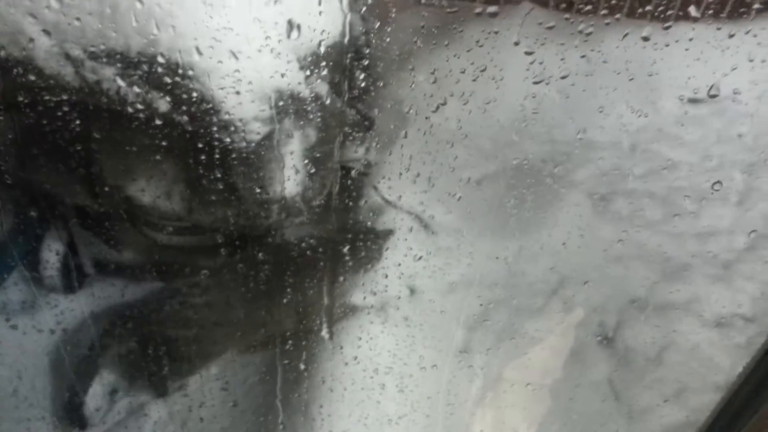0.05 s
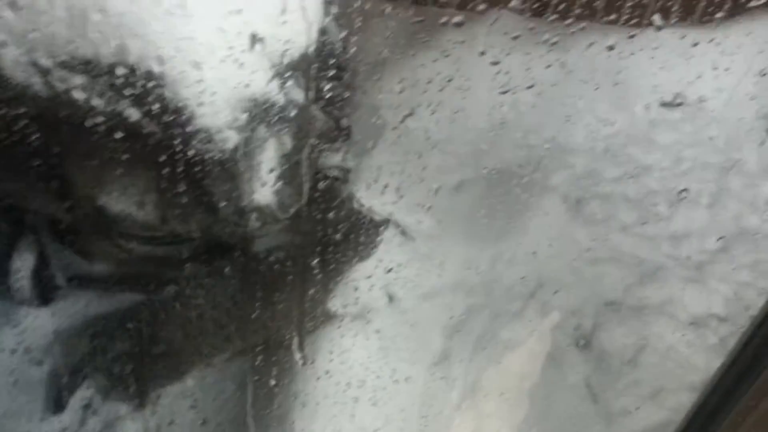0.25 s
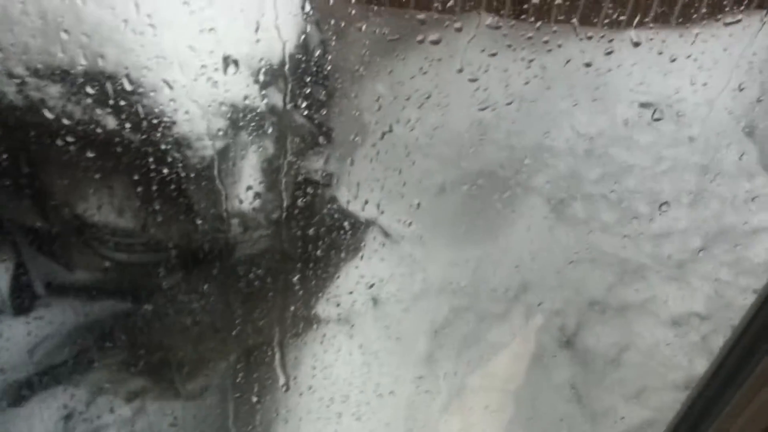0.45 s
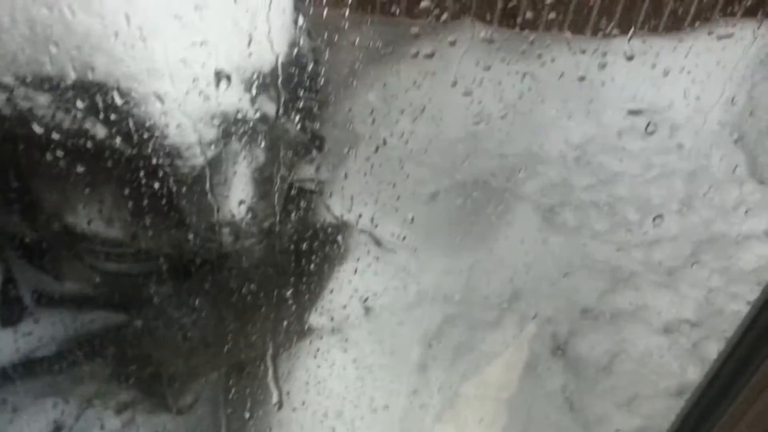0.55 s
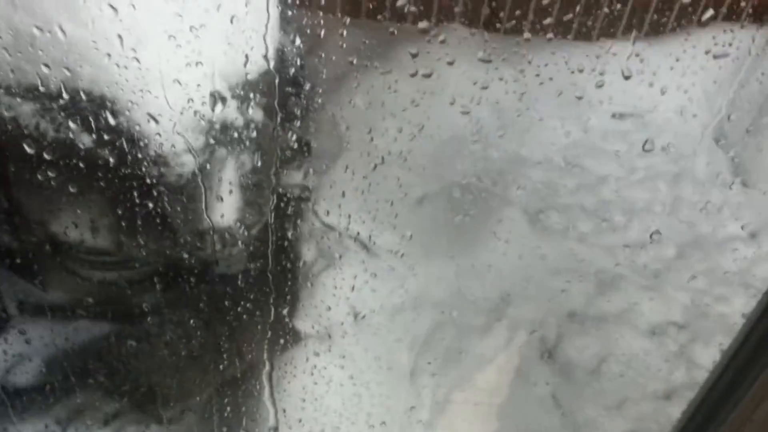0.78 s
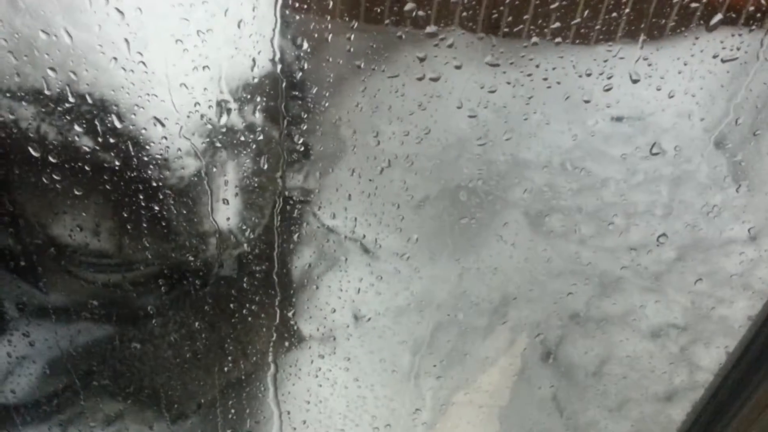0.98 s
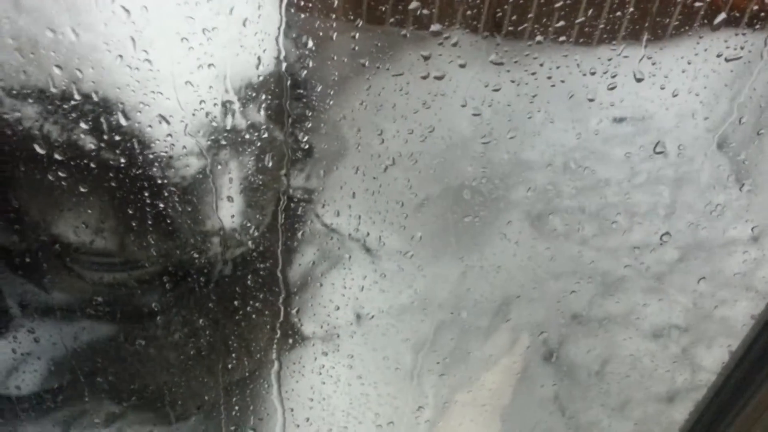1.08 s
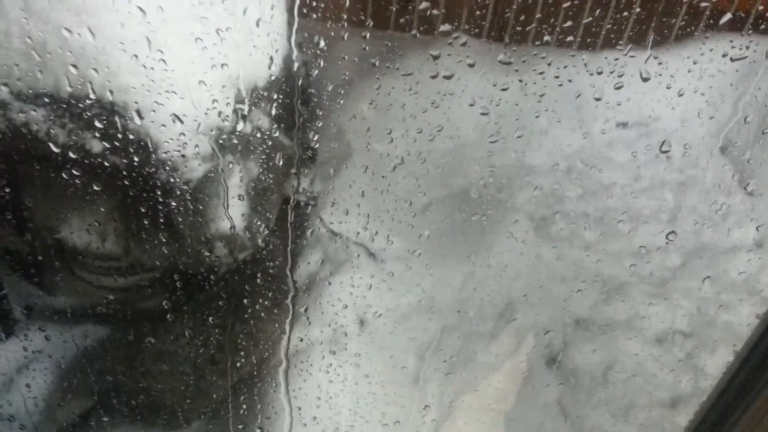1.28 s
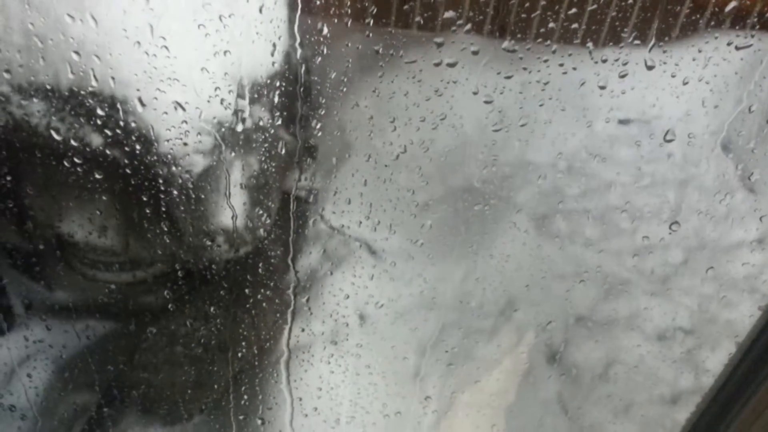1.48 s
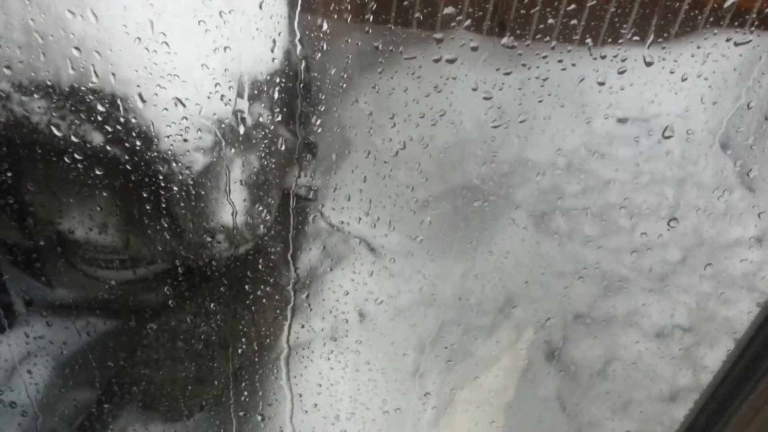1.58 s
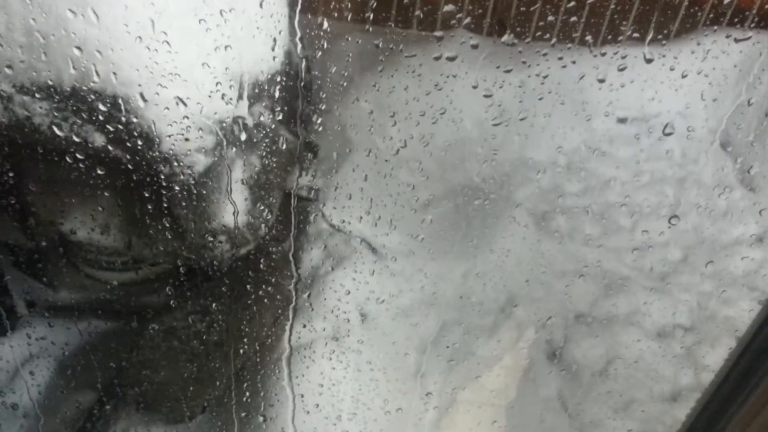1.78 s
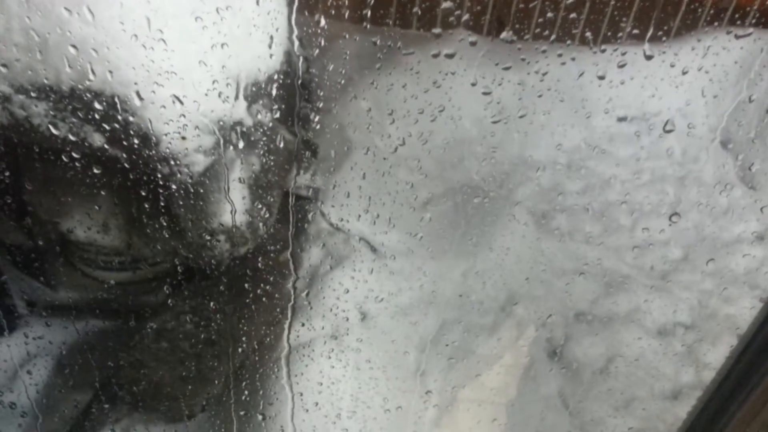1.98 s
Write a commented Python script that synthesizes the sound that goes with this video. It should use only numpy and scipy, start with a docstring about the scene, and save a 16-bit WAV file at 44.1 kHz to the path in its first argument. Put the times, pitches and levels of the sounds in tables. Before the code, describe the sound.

A scraper rubs against a wet window pane in four quick, gritty strokes, each starting with a clattering knock and catching with brief squeaks. A fifth just begins. Close hard walls echo it over faint outdoor hiss.

```python
"""A hollow scraper is set down on a wet, gritty surface beside a window and pushed four times.
Each stroke (0.2, 0.7, 1.3, 1.7 s) opens with a clattering knock. Then slips make the body judder,
grit rasps on the edge, and the blade catches now and then with a short stick-slip squeal.
A fifth stroke just lands at 2 s. Throughout, close hard walls throw it all back,
over a faint outdoor rumble and hiss."""
import sys
import numpy as np
from scipy import signal
from scipy.fft import rfft, irfft
from scipy.io import wavfile
from scipy.ndimage import uniform_filter1d

SR = 44100
rng = np.random.default_rng(int(sys.argv[2]) if len(sys.argv) > 2 else 0)


def persist_wave(psi):
    """Save psi, clipped to +-1, as 16-bit WAV."""
    counts = np.round(np.clip(psi, -1, 1) * 32767).astype(np.int16)
    wavfile.write(sys.argv[1], SR, np.atleast_2d(counts).T)


N = 90404
TIME_S = np.arange(N) / SR

# Sliding force, one list per stroke. Each row: time in seconds, body, edge and fizz levels in dB.
STROKE_LEVELS = [
    [(.18, -39.5, -57, -57), (.24, -39.5, -38, -52), (.295, -45.5, -30, -39.5), (.365, -38.5, -32, -33.5),
     (.435, -35, -35.5, -37), (.5, -57.5, -48, -59), (.53, -84, -54, -93)],
    [(.7, -50, -42.5, -47), (.745, -35, -41.5, -53), (.81, -45, -32, -45), (.855, -43.5, -32, -35.5),
     (.925, -29, -24, -34), (.965, -47, -38, -43.5), (1.035, -47.5, -30, -39.5), (1.09, -53, -58, -53),
     (1.12, -78, -68, -80)],
    [(1.33, -49, -30, -51), (1.385, -33, -40.5, -41), (1.43, -36, -38.5, -55), (1.48, -53, -51, -55),
     (1.52, -50, -66, -78)],
    [(1.68, -50, -52, -64), (1.73, -36.5, -37.5, -54.5), (1.79, -39, -39.5, -52), (1.83, -58, -42, -53.5),
     (1.87, -70, -85, -83)],
]
# Blade knocks. Each row: start and hold in seconds, body, edge, fizz and thump levels in dB.
BLADE_KNOCKS = [(0.172, 0.018, -32.5, -35, -57, -56), (0.688, 0.015, -27, -33, -46.5, -46.5),
                (0.914, 0.0048, -41, -30.5, -44, -46), (.921, 0.0041, -32.5, -19, -32, -33),
                (0.967, 0.012, -29.5, -40, -56, -48.5), (1.317, 0.018, -23.5, -32, -46, -50),
                (1.395, 0.0064, -28.5, -25, -55, -42.5), (1.671, 0.024, -29.5, -35, -79, -50.5),
                (1.947, 0.026, -53, -39.5, -44, -66), (2.041, 0.024, -31, -30, -38.5, -58)]
# Blade catches. Each row: start and hold in seconds, pitch and wobble rate in Hz, level in dB.
BLADE_SQUEALS = [(0.178, 0.14, 1377, 60.3, -42), (0.181, 0.035, 3693, 100, -42.5),
                 (0.274, 0.042, 1510, 160, -39), (0.293, 0.046, 3157, 510, -29),
                 (0.314, 0.078, 993, 45, -37.5), (0.683, 0.059, 1382, 59.5, -43),
                 (0.689, .036, 3730, 100, -49.5), (0.83, 0.12, 3820, 112.5, -31.5),
                 (0.912, 0.004, 2490, 347, -18), (0.917, 0.0051, 1596, 112, -26),
                 (.931, 0.012, 2812, 257, -25), (0.969, .03, 818, 30.2, -32.5),
                 (1.322, 0.016, 1035, 91, -26.5), (1.324, 0.016, 729.3, 45.7, -30.5),
                 (1.393, 0.0056, 2204, 167.4, -22), (1.431, 0.125, 2519, 79, -45),
                 (1.454, 0.069, 588, 111.6, -46.5), (1.678, 0.022, 1027, 80, -33.5),
                 (2.041, 0.011, 2122, 165, -27), (2.041, .02, 1500, 394, -29.5)]
# Grip on the body. Each row: time in seconds, highs minus lows in dB.
GRIP_TILT = [(.18, -8.5), (.35, 4.5), (.46, -0.5), (.72, -2.5), (.92, -26), (1.0, -10.5), (1.33, 8),
             (1.43, -1), (1.68, 5), (1.8, 8.5)]
# Resonances of body and edge. Each row: frequency in Hz, width in Hz, level in dB.
BODY_MODES = [(641.3, 26, -8.5), (729, 59, -1.5), (798, 61, -2.5), (943, 42.6, 3.5), (1059, 82, -4)]
EDGE_MODES = [(1354, 35, -3.5), (1640, 150, -5.5), (2095, 173, 2), (2314, 20, 2.5), (2451, 135, 5),
              (2755, 93, 4.5), (3230, 166, -3), (3800, 195, 2), (4140, 26, -3), (4500, 130, -5)]
# Broad spectra of the scraper's parts. Each row: frequency in Hz, relative level in dB.
BODY_SPECTRUM = [(100, -44), (300, -29), (520, -24), (680, -8), (1100, -13), (1300, -19.5), (2000, -13),
                 (8000, -87.5)]
EDGE_SPECTRUM = [(100, -47), (400, -44), (700, -30.5), (1200, -10.5), (1800, -15.5), (2500, -1), (3300, -5),
                 (4300, -2), (5300, -18), (7000, -19.5), (14000, -70)]
FIZZ_SPECTRUM = [(300, -63), (2500, -6), (4000, 2.5), (5200, 2.5), (6800, -1.5), (8500, -4), (10000, -10.5),
                 (11200, -9), (12500, -27.5), (14500, -14.5)]
THUMP_SPECTRUM = [(90, -19.5), (230, -6.5), (400, 0.5), (600, -6.5), (900, -23), (4000, -38)]
# Echo decay. Each row: frequency in Hz, T60 in seconds.
WALL_T60 = [(200, 0.42), (800, .48), (2400, 0.4), (5500, 0.34), (12000, 0.22)]
# Likeness of left and right. Each row: frequency in Hz, coherence from 0 to 1.
COHERENCE = [(60, .75), (300, 0.42), (750, 0.58), (950, 0), (1080, 0.59), (1400, 0), (3000, 0), (14000, 0)]
# Stereo balance of the scraper. Each row: frequency in Hz, left minus right in dB.
BALANCE = [(200, 1.5), (750, 0), (960, 0.5), (1300, 1.5), (2500, 3), (4000, 1.5), (6000, 2.5), (8500, -2),
           (14000, -6.5)]
# Outdoor air and wash. Each row: frequency in Hz, relative level in dB.
AIR_SPECTRUM = [(15, -50), (25, -55), (54, -5), (90, -9.5), (105, -5), (124, -0.5), (189, -11.5), (205, -1),
                (443, -20), (493, -17), (1100, -19), (6520, -29.5), (11700, -29), (14500, -31.5)]
WASH_SPECTRUM = [(30, -35), (100, -13), (200, -6), (330, -1), (600, -12.5), (2000, -16.5), (8000, -22.5),
                 (14000, -22.5)]
# Swell of the wash. Each row: time in seconds, level in dB.
WASH_LEVELS = [(.1, -67.5), (.42, -61.5), (.64, -54), (1.25, -57), (1.6, -58.5), (2.0, -54.5)]

BODY, EDGE, FIZZ, THUMP = range(4)  # order of the level columns
SLIPS_PER_S, GRAINS_PER_S, FIZZ_PER_S = 420, 2200, 4400
SLIP_SPREAD_DB, GRAIN_SPREAD_DB = 3, 1.5
CHATTER_HZ, CHATTER_DB = 82, 1.16


def scraper():
    """Slips shake the hollow body, grit rings the edge, fine grains fizz; knocks add a thump."""
    chatter = unit(amp(CHATTER_DB * wobble(CHATTER_HZ)))
    slips = steady(clicks(SLIPS_PER_S, SLIP_SPREAD_DB), size=1000) * chatter
    body = grip(ring(sliding(slips, BODY) + clatter(BODY), BODY_SPECTRUM, BODY_MODES))
    grit = clicks(GRAINS_PER_S, GRAIN_SPREAD_DB) * chatter
    edge = ring(sliding(grit, EDGE) + clatter(EDGE), EDGE_SPECTRUM, EDGE_MODES)
    fine_grit = clicks(FIZZ_PER_S, GRAIN_SPREAD_DB) * chatter
    fizz = ring(sliding(fine_grit, FIZZ) + clatter(FIZZ), FIZZ_SPECTRUM)
    thump = ring(clatter(THUMP), THUMP_SPECTRUM)
    return body + edge + fizz + thump


def sliding(grains, part):
    """Force on one part from grains passing under the blade."""
    force = np.zeros(N)
    for stroke in map(np.array, STROKE_LEVELS):
        force += amp(np.interp(TIME_S, stroke[:, 0], stroke[:, 1 + part], left=-np.inf, right=-np.inf))
    return grains * force


def clatter(part):
    """Force on one part from the knocks: a dense rattle, hardest at its start."""
    force = sum(burst(start_s, hold_s, levels_db[part], fade_db_per_s=148)
                for start_s, hold_s, *levels_db in BLADE_KNOCKS)
    return force * steady(clicks(per_s=3000, spread_db=6.5), size=160)


def grip(body, split_hz=887):
    """The grip shifts weight between the body's low and high resonances."""
    crossover = [signal.butter(4, split_hz, kind, fs=SR, output="sos") for kind in ("low", "high")]
    low, high = (signal.sosfilt(np.tile(sos, (2, 1)), body) for sos in crossover)
    tilt_db = np.interp(TIME_S, *np.transpose(GRIP_TILT))
    up, down = amp(tilt_db / 2), amp(-tilt_db / 2)
    return (down * low + up * high) / np.sqrt((up ** 2 + down ** 2) / 2)


def squeals(flutter_db=2.25):
    """Stick-slip: the blade catches and one resonance sings, unsteady and fading."""
    out = np.zeros(N)
    for start_s, hold_s, centre_hz, wobble_hz, db in BLADE_SQUEALS:
        pitch_hz = centre_hz + .45 * wobble_hz * wobble(wobble_hz)
        tone = np.sin(2 * np.pi * np.cumsum(pitch_hz) / SR) * amp(flutter_db * wobble(wobble_hz))
        out += unit(tone) * burst(start_s, hold_s, db, fade_db_per_s=56)
    return out


def ring(force, spectrum, modes=(), size=8192):
    """Response of a part: resonances on a broad spectrum, minimum phase, unit energy."""
    hz = bins(size)
    power = amp(read(spectrum, hz)) ** 2
    for mode_hz, width_hz, db in modes:
        power += amp(db) ** 2 / (1 + ((hz - mode_hz) / (.75 * width_hz)) ** 2) ** 2
    log_gain = np.log(power + 1e-10) / 2
    mirrored = np.r_[log_gain, log_gain[-2:0:-1]]
    response = np.exp(np.conj(signal.hilbert(mirrored)))
    taps = np.fft.ifft(response).real[:size // 2]
    return signal.fftconvolve(force, taps / np.linalg.norm(taps))[:N]


def clicks(per_s, spread_db):
    """Tiny slips of random time, sign and size; rms 1."""
    size = amp(spread_db * np.minimum(rng.exponential(1, N), 4))
    return unit(size * rng.choice([-1., 1.], N) * (rng.random(N) < per_s / SR))


def burst(start_s, hold_s, db, fade_db_per_s, attack_s=.002, release_s=.0061):
    """Envelope of one contact: quick attack, fading hold, quick release."""
    age_s = np.maximum(TIME_S - start_s, 0)
    gate = np.minimum(age_s / attack_s, 1) * np.exp(-np.maximum(age_s - hold_s, 0) / release_s)
    return gate * amp(db - fade_db_per_s * age_s)


def travel(x, step_s=.07, patterns=3):
    """As the scraper moves, reflection patterns crossfade in a cycle."""
    place = TIME_S / step_s
    distances = [abs((place - k + patterns / 2) % patterns - patterns / 2) for k in range(patterns)]
    return sum(walls(x * np.cos(np.pi / 2 * np.minimum(d, 1))) for d in distances)


def walls(x, direct_db=-8.5, early_per_s=8000, early_t60_s=.023, size=32768):
    """Close hard walls: weak direct sound, dense early reflections, short diffuse tail."""
    hz, frame_s, noise = signal.stft(rng.standard_normal((2, size)), SR, nperseg=256)
    decay = amp(-60 * frame_s / read(WALL_T60, hz)[:, None])
    tail = signal.istft(noise * decay, SR, nperseg=256)[1][:, :size]
    early = rng.choice([-1., 1.], (2, size)) * (rng.random((2, size)) < early_per_s / SR)
    early *= amp(-60 * TIME_S[:size] / early_t60_s)
    echo = stereo(sum(part / np.linalg.norm(part, axis=1)[:, None] for part in (tail, early)))
    echo[:, 0] += amp(direct_db)
    wet = signal.fftconvolve(x[None], echo / np.linalg.norm(echo[0]), axes=1)
    side_db = read(BALANCE, bins(wet.shape[1])) / 2
    return irfft(rfft(wet) * amp([side_db, -side_db]), wet.shape[1])[:, :N]


def outdoors(air_db=-56.5):
    """Faint rumble and hiss; a soft wash swells in the distance."""
    wash_db = np.interp(TIME_S, *np.transpose(WASH_LEVELS))
    return amp(air_db) * shaped_noise(AIR_SPECTRUM) + amp(wash_db) * shaped_noise(WASH_SPECTRUM)


def shaped_noise(spectrum):
    """Stereo noise of a given spectrum; rms 1."""
    white = stereo(rng.standard_normal((2, N)))
    return unit(irfft(rfft(white) * amp(read(spectrum, bins(N))), N))


def stereo(x):
    """Makes two unrelated channels partly alike in the lows."""
    mid, side = rfft(x)
    angle = np.arccos(read(COHERENCE, bins(x.shape[1]))) / 2
    mid, side = mid * np.cos(angle), side * np.sin(angle)
    return irfft([mid + side, mid - side], x.shape[1])


def wobble(hz):
    """Random drift below hz; rms 1."""
    return unit(irfft(rfft(rng.standard_normal(N)) / (1 + (bins(N) / hz) ** 4), N))


def steady(x, size):
    """Evens the level over size samples."""
    return x / np.sqrt(abs(uniform_filter1d(x ** 2, size)) + 1e-6)


def amp(db):
    """dB to gain."""
    return 10 ** (np.asarray(db) / 20)


def unit(x):
    """Scales to rms 1."""
    return x / np.sqrt(np.mean(x ** 2) + 1e-20)


def read(table, hz):
    """Interpolates along log frequency."""
    row_hz, values = np.transpose(table)
    return np.interp(np.log(hz + 1), np.log(row_hz + 1), values)


def bins(size):
    """FFT frequencies in Hz."""
    return np.fft.rfftfreq(size, 1 / SR)


def scene():
    """The scraper among hard walls, over the outdoor background."""
    return travel(scraper() + squeals()) + outdoors()


def record(dry, bass_hz=104, threshold_db=-42, cut_db_per_db=1.13, top_hz=14600):
    """Ducks the deep bass while the sound is loud, then limits the band."""
    level_db = 10 * np.log10(abs(uniform_filter1d((dry ** 2).mean(0), size=2000)) + 1e-12)
    bass = irfft(rfft(dry) / (1 + (bins(N) / bass_hz) ** 8), N)
    bass_gain = amp(-cut_db_per_db * np.maximum(level_db - threshold_db, 0))
    ducked = dry - bass * (1 - bass_gain)
    lowpass = signal.firwin(1023, top_hz, window=("kaiser", 9), fs=SR)
    return signal.oaconvolve(ducked, lowpass[None], "same")


dry = scene()
out = record(dry)
persist_wave(out)
```